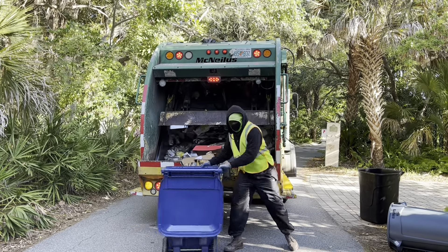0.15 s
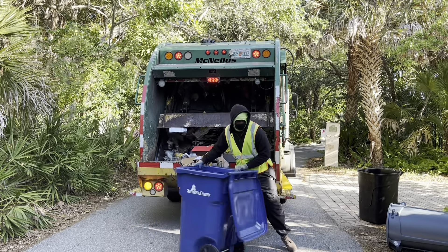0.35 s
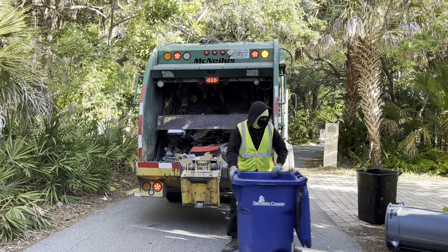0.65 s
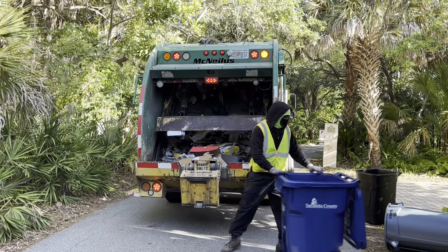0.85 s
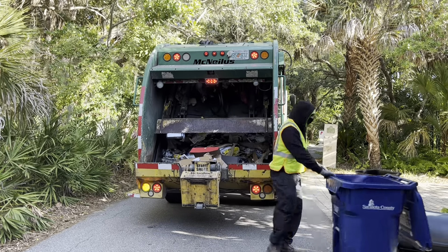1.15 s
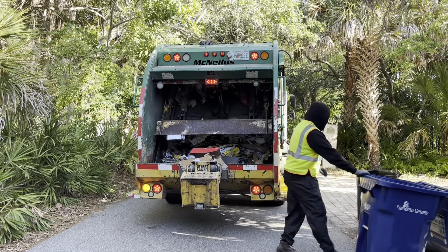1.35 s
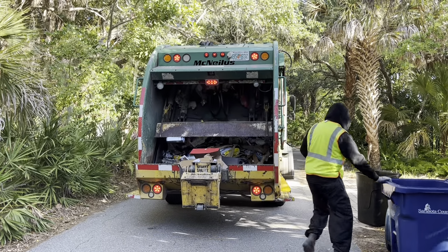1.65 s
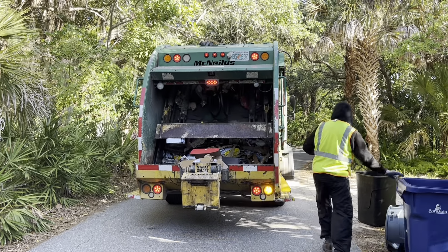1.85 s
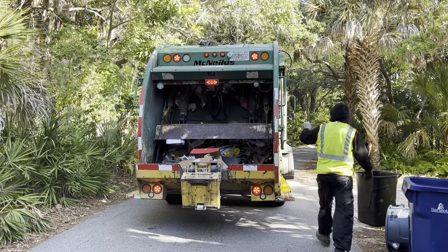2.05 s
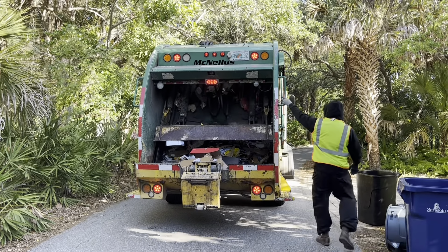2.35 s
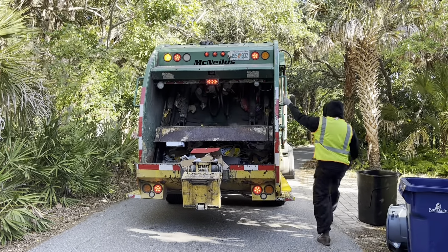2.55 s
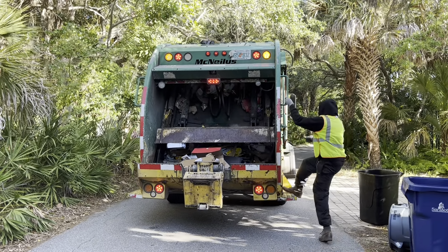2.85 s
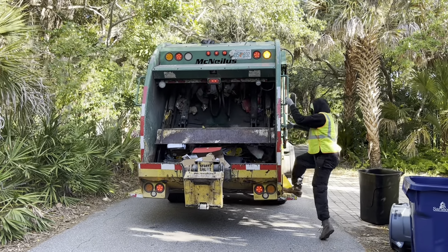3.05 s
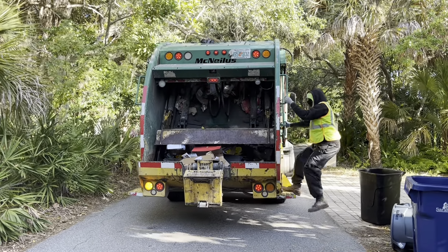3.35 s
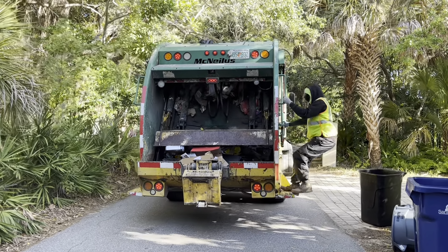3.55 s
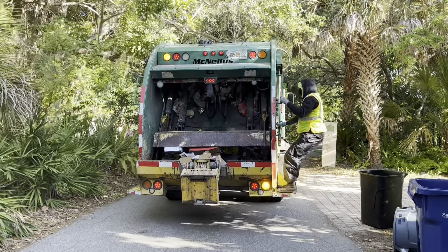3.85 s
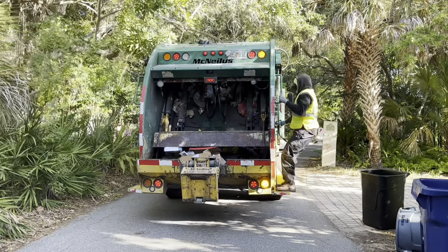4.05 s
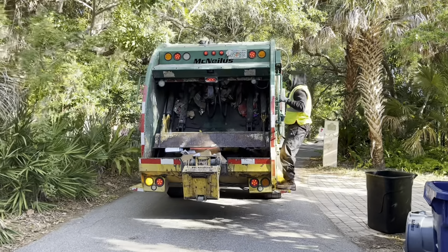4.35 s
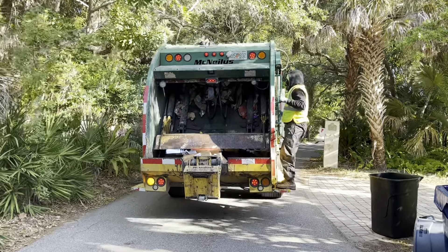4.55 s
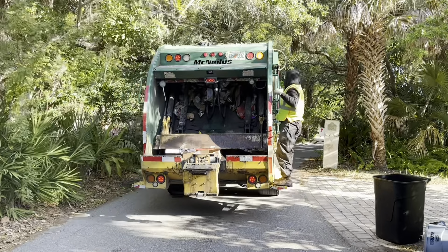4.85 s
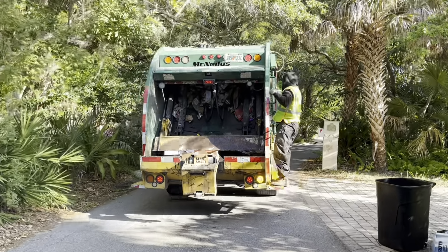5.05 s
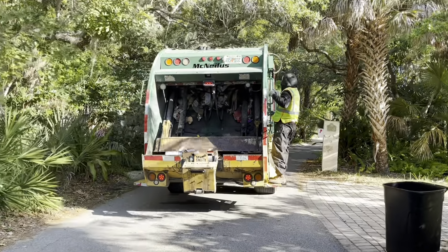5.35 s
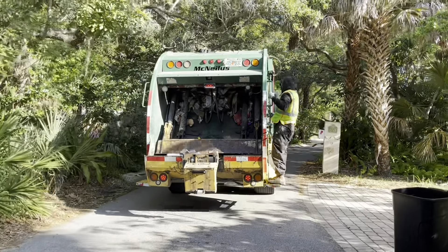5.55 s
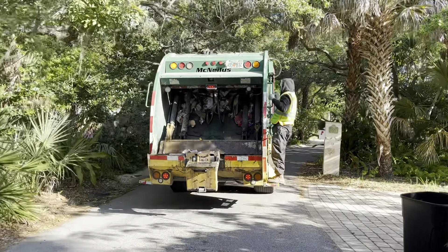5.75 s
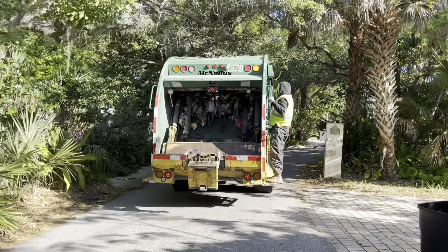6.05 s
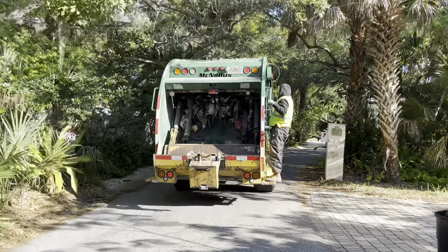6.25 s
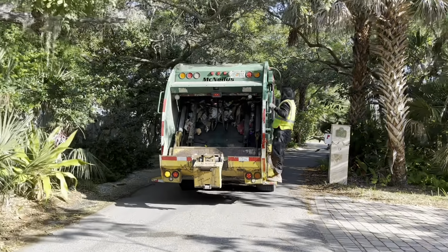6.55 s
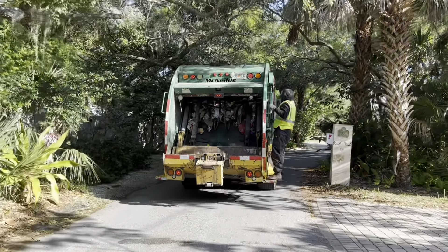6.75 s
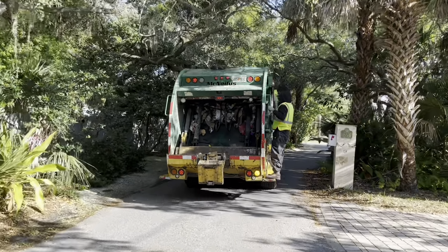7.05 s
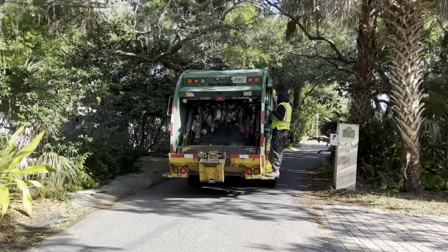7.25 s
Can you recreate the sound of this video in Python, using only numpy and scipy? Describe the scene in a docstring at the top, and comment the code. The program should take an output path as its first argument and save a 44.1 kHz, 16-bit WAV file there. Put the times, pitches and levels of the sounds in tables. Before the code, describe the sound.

Empty plastic bin clatters down and trundles aside, diesel truck idles, brake air bursts out, engine climbs, and loose steel bangs over a bump.

```python
"""Refuse truck and plastic cart

A refuse truck idles on a leafy lane while an empty plastic cart crashes down, is rolled aside and parked.
The air brake blows off, the gear engages and the truck pulls away; its steel body bangs over a bump.
Engine and squeaks are summed tones and noise; cart and truck body are resonances, struck or fed noise;
air is coloured noise. Two microphone ports hear everything with their own phase difference."""
import sys
import numpy as np
from scipy import signal
from scipy.fft import rfft, irfft, next_fast_len
from scipy.io import wavfile
from scipy.ndimage import map_coordinates

SR = 44100
rng = np.random.default_rng(int(sys.argv[2]) if len(sys.argv) > 2 else 0)


def file_out(sig):
    """Save sig as 16-bit WAV at sys.argv[1]."""
    # one column per channel
    cols = np.atleast_2d(sig).T
    # limit, then scale
    lim = np.clip(cols, -1, 1)
    pcm = np.round(lim * 32767).astype(np.int16)
    wavfile.write(sys.argv[1], SR, pcm)


N = 325899

# Engine speed. Each row: time in seconds, firing rate in Hz.
SPEED = [(0, 21.7), (1, 21.3), (1.9, 19.6), (2.15, 18.1), (2.4, 17.6), (2.7, 17.7), (2.85, 18.4),
         (3.9, 19.1), (4.15, 22.9), (4.4, 25.3), (4.65, 27.2), (4.9, 28.5), (5.4, 30.5), (5.9, 32.5),
         (6.4, 35.2), (6.85, 35.3), (7, 37), (7.15, 38), (7.39, 38.4)]
# Engine effort. Each row: time in seconds, effort in dB.
EFFORT = [(0, 10), (.5, 5), (1.9, -16.5), (2.4, -5), (3, -2), (3.85, 0), (4.15, 3.5), (4.5, 1.5), (6.85, 3),
          (7.05, 2), (7.39, -1.5)]
# Exhaust pipe. Each row: frequency in Hz, gain in dB.
PIPE = [(30, -6), (55, -16), (80, -1.5), (115, 3), (155, -10), (230, -21.5), (400, -28)]
# Strength of firing orders 2 to 10 in dB.
ORDERS_DB = [0, 2, 2.5, -5, -1.5, -9, -6.5, -13, -3]
# Pump whirr against its pitch. Each row: frequency in Hz, level in dB.
PUMP = [(117, -54.5), (127, -35), (143, -36.5), (153, -61), (170, -27), (190, -31), (203, -24.5),
        (217, -29), (235, -34), (250, -32.5)]
# Pump overtones. Each row: multiple of the pump order, dB at idle, dB per octave of speed.
OVERTONES = [(2, 0.5, -1), (12 / 5, -14, 9), (3, -2, -14), (4, -14, -6), (5, -18, 0)]
# Engine roar, also road rumble. Each row: frequency in Hz, density in dB per Hz.
ROAR = [(20, -57), (40, 0), (100, 2.5), (170, -5.5), (280, -10.5), (420, -9), (650, -15), (1100, -23),
        (1550, -20), (1800, -21.5), (2400, -26.5), (3700, -29), (5500, -38.5), (7500, -51), (10000, -120)]
# Fan, also hisses and ticks. Each row: frequency in Hz, density in dB per Hz.
FAN = [(2500, 3.5), (4000, -6.5), (7000, -0.5), (10000, -2), (12500, -9), (14200, -11.5), (15300, -14),
       (16000, -28)]
# Wandering turbo whistle. Each row: time in seconds, pitch in Hz.
TURBO = [(2, 4150), (2.5, 4400), (3.7, 4400), (4.15, 4680), (4.7, 4520), (5.4, 4580), (7.39, 4350)]
# Engine layers. Each holds: level at idle in dB, dB per octave of speed, share of the effort.
EXHAUST_LEVEL = (-31, 8.43, 0.48)
ROAR_LEVEL = (-37, 10.13, 0.19)
FAN_LEVEL = (-53.5, 8, 0.35)
TURBO_LEVEL = (-53.5, 5.2, 0.54)
IDLE_RATE_HZ, PUMP_ORDER = 18.5, 20 / 3
OVERTONE_SWING, OVERTONE_DB = 0.37, -27  # overtones follow a share of the whirr's dB
PULL_S, PULL_RISE_S, PULL_DB = 6.87, 0.062, 7.5  # the next gear deepens the exhaust note
TURBO_ON_S, TURBO_RISE_S, TURBO_DRIFT_HZ = 1.5, 0.5, 40

# Drumming of the rolling cart. Each row: time in seconds, level in dB.
ROLL = [(0, -43), (.3, -21.5), (.45, -20.5), (.62, -25), (.9, -20.5), (1.36, -24.5), (1.46, -49),
        (1.56, -44), (1.7, -29), (2, -44), (2.37, -38.5)]
# Air and floor of the cart. Each row: frequency in Hz, width in Hz, gain in dB.
DRUM = [(77, 21.8, 1), (104, 26.7, 1.5), (191.6, 51, -11)]
# Walls of the cart. Each row: frequency in Hz, width in Hz, gain in dB.
WALL = [(215, 57, -1), (553, 59, -2), (708, 150, -6), (1200, 570, -18.5)]
# Strongest wall mode before and after the cart is righted. Each holds: frequency in Hz, width in Hz, gain in dB.
TILTED = (340, 30, 2)
UPRIGHT = (440, 36, 6)
# Stiff lid that clacks. Each row: frequency in Hz, width in Hz, gain in dB.
LID = [(2000, 120, 2), (2960, 120, 0), (3400, 160, -1), (4230, 250, -2)]
# Loose grit. Each row: frequency in Hz, density in dB per Hz.
GRIT = [(600, -1.5), (1000, 3), (1500, 6), (2000, 2.5), (3000, -4), (4200, -8.5), (6500, -16.5), (9000, -9),
        (12000, -56), (15000, -55)]
# Cracks and scuffs. Each row: frequency in Hz, density in dB per Hz.
SNAP = [(900, 3.5), (2000, 3), (4000, -2), (7000, -7), (11000, -8.5), (15000, -23)]
# Cart knocks. Each row: time in seconds, ring in dB, crack in dB.
KNOCKS = [(0.099, -18, -31.5), (0.114, -9.5, -10.5), (.138, -12, -16), (.152, -18, -20),
          (.165, -10.5, -20.5), (0.176, -18, -29), (0.19, -11.5, -23), (0.202, -12, -23.5),
          (0.276, -26, -21), (0.32, -10.5, -26.5), (.334, -11.5, -27), (0.36, -16.5, -37),
          (0.487, -28, -40.5), (0.61, -17.5, -35.5), (0.619, -12, -51), (.638, -14.5, -55),
          (.688, -21, -33.5), (.706, -9, -34.5), (.752, -15, -43), (0.817, -23, -61), (.875, -18.5, -36.5),
          (.916, -14, -31.5), (1.032, -19.5, -36.5), (1.136, -30, -37.5), (1.199, -24.5, -38),
          (1.306, -25, -46), (1.345, -25, -43.5), (1.583, -20, -33), (1.659, -19, -45.5), (1.81, -26, -54),
          (1.876, -31, -56)]
# Cart scuffs the road. Each row: time in seconds, level in dB, t60 in seconds.
SCUFFS = [(0.266, -24, 0.28), (0.459, -35.5, 0.056), (.758, -23, 0.03), (1.827, -36.5, 0.13),
          (1.963, -43, 0.21), (2.225, -45, 0.25)]
# Wheels drop over joints in the paving. Each row: time in seconds, level in dB.
BUMPS = [(0.12, -7.5), (0.17, -12), (0.331, -14), (0.729, -0.5), (0.756, -18), (.797, -26), (.942, -6),
         (1.043, -15), (1.215, -5), (1.251, -27), (1.299, -10.5), (1.347, -10.5), (1.599, -8)]
RIGHTED_S = 0.5
WALLS_UNDER_DB, RUMBLE_UNDER_DB = -7, -28  # against the drumming
SHAKE_DB, SHAKE_T60_S = -8, 0.26  # walls shake on after a knock
THUD_DB, LID_DB = -2, -1.5  # drum against ring, lid against crack
CRACK_T60_S = 0.057
GRIND_DB, GRIND_T60_S = -1, 0.36  # grit clatters on after a crack
SCUFF_GRIT_LASTS = 1.03  # grit t60 over scuff t60
BUMP_RISE_S, BUMP_T60_S, BUMP_RUMBLE_DB = 0.016, 0.27, -4

# Truck body blows. Each row: time in seconds, panel in dB, boom in dB, treble in dB.
BANGS = [(3.978, -27.5, -32, -57), (3.988, -28.5, -32, -57), (4.015, -32, -34, -49), (4.035, -30, -31, -51),
         (4.061, -35, -28, -54), (5.999, -26.5, -48, -61), (6.445, -25, -32, -32), (6.479, -17, -19, -29.5),
         (6.493, -20, -15.5, -27), (6.505, -16, -16, -42), (6.548, -18.5, -19, -27), (6.575, -23, -21, -39),
         (6.717, -16.5, -28, -25.5), (6.726, -17.5, -29, -24), (6.734, -12.5, -20, -26.5),
         (6.769, -30, -23, -32)]
# Body panels. Each row: frequency in Hz, width in Hz, gain in dB.
PANEL = [(270, 42, -1.5), (368, 114, 0), (509, 70, 1.5), (787, 160, -6), (1390, 160, -9.5),
         (1660, 240, -12), (3400, 150, -23)]
# Broad boom. Each row: frequency in Hz, width in Hz, gain in dB.
BOOM = [(57.6, 50, -0.5), (105, 65, 1.5)]
# Hopper ring. Each row: frequency in Hz, width in Hz, gain in dB.
HOPPER = [(60, 11, -0.5), (107, 11.5, 2)]
# Rattle. Each row: frequency in Hz, density in dB per Hz.
RATTLE = [(900, -27), (1500, -5), (2000, -4), (3300, -1.5), (5000, -11.5), (8000, -8.5), (11000, -15),
          (15000, -50)]
# Loose steel. Each row: frequency in Hz, width in Hz, gain in dB.
STEEL = [(1710, 50, 1), (1890, 60, 4), (2050, 80, -3), (2360, 110, -10), (3380, 60, -14), (4500, 150, -16)]
# Ringing steel plate: start in seconds, frequency in Hz, level in dB, t60 in seconds.
PLATE = (6.73, 714.5, -15, 0.5)
# Loose steel ticks. Each row: time in seconds, level in dB.
TICKS = [(.035, -31.5), (4.385, -40), (5.454, -29)]
PANEL_T60_S, BOOM_T60_S, RATTLE_T60_S, STEEL_T60_S, TICK_T60_S = 0.25, 0.51, 0.21, 0.25, 0.072
SHUDDER_DB, HOPPER_DB, STEEL_DB = -1, 4.5, 2  # against panel, boom and treble

# High hiss swells. Each row: start in seconds, length in seconds, peak in dB.
HISSES = [(0.153, 0.28, -38), (0.58, 0.88, -46.5), (1.585, 0.46, -50), (2.79, 0.68, -50.5),
          (4.502, 0.5, -43), (6.39, 0.6, -39.5), (6.9, 0.12, -39)]

HUM_FULL_S, HUM_FADE_S, HUM_EDGE_S, HUM_HZ, HUM_DB = 1.81, 2.51, 0.24, 269.7, -40

# Two quick plops. Each row: time in seconds, top pitch in Hz, level in dB.
PLOPS = [(2.258, 1100, -27), (2.314, 1700, -29)]
PLOP_END_HZ, PLOP_FALL_S, PLOP_T60_S = 130, 0.0035, 0.09

# Brake air jet. Each row: frequency in Hz, density in dB per Hz.
JET = [(700, -7.5), (1500, -8.5), (1800, -5), (2600, -7.5), (3250, -9.5), (3800, -9), (5000, -9),
       (8000, -4), (11000, -4.5), (14000, -11), (16000, -29.5)]
# Throat of the valve. Each row: frequency in Hz, width in Hz, gain in dB.
VALVE = [(2500, 180, -10), (3360, 200, -3), (3940, 180, -1), (4820, 250, 0)]
AIR_S, AIR_ATTACK_S, AIR_HOLD_S, AIR_DB, AIR_T60_S = 2.66, 0.035, 0.072, -30.5, 0.67
VALVE_DB, VALVE_HOLD_S, WHISTLE_DB = -6, 0.045, -7  # dB against the jet
WHISTLE_HZ, WHISTLE_SAG_HZ = 3610, 405

# Squeaks. Each row: start in seconds, end in seconds, pitch in Hz, dB of multiples 1, 2 and 4.
SQUEAKS = [(4.032, 4.055, 2100, -41, -70, -80), (4.04, 4.097, 3220, -41, -70, -80),
           (4.063, 4.088, 1710, -41, -60, -80), (6.672, 6.703, 2980, -33, -39, -37),
           (6.685, 6.73, 5930, -35, -36, -90)]
SQUEAK_WAVER, SQUEAK_GRAIN_DB = 0.002, 1  # share of the pitch, unevenness

# Port phase. Each row: frequency in Hz, lead of the left port in radians.
TURN = [(0, .5), (130, .55), (260, .85), (600, .1), (1030, -.4), (1290, -2.1), (1550, -3), (1890, -6.4),
        (2500, -5.5), (3360, -5.2), (3960, -5.9), (4650, -5.8), (5770, -7.4), (6290, -7.3), (7320, -8.4),
        (7700, -9.35), (8870, -9.5), (9130, -10.2), (10200, -11.1), (11100, -12.5), (13000, -12.6),
        (13800, -14.1), (14500, -15.7), (16000, -15.7)]
# Port balance. Each row: frequency in Hz, left minus right in dB.
TRUCK_SIDE = [(60, 3.0), (110, 3.5), (200, 6.0), (380, 6.0), (700, 9.0), (1290, 6.5), (2380, 3.0),
              (4400, 8.0), (8120, 1.0), (15000, 0.0)]
# Diffuse share, different in each channel. Each row: frequency in Hz, level in dB.
DIFFUSE = [(60, -33), (200, -19.5), (500, -8.5), (1400, -4.5), (4000, -6), (6500, -24), (8200, -66),
           (11000, -11), (15000, -14)]
CART_SIDE_SHARE, CART_DIFFUSE_DB = 0.7, 1  # cart is nearer the middle, more diffuse
LOW_HZ, TOP_HZ = 43, 15735  # band of the microphone


def amp(db):
    """Decibels to amplitude."""
    return 10 ** (np.asarray(db) / 20)


def unit(x):
    """Scale to rms 1."""
    return x / np.sqrt(np.mean(x ** 2) + 1e-20)


def along(points, hz):
    """Read (Hz, value) points on a log axis."""
    f, v = np.transpose(points)
    return np.interp(np.log(hz + 1), np.log(f + 1), v)


def curves(rows):
    """One value per sample for each column after the time."""
    s, *cols = np.transpose(rows)
    return [np.interp(np.arange(N) / SR, s, c) for c in cols]


def ramp(start_s, length_s):
    """0 before the start, 1 after start + length."""
    return np.clip((np.arange(N) / SR - start_s) / length_s, 0, 1)


def wobble(rate_hz):
    """Smooth random curve with rate_hz knots a second."""
    knots = rng.standard_normal(int(N * rate_hz / SR) + 4)
    return map_coordinates(knots, [np.arange(N) * rate_hz / SR])


def tone(hz):
    """Sine of a moving pitch."""
    return np.sin(2 * np.pi * np.cumsum(hz) / SR)


def filtered(x, response):
    """Multiply the spectrum of x by a response of frequency."""
    m = next_fast_len(N + SR // 8)
    return irfft(rfft(x, m) * response(np.fft.rfftfreq(m, 1 / SR)), m)[..., :N]


def colour(points):
    """Gain of frequency from a table of dB points."""
    return lambda hz: amp(along(points, hz))


def modes(table):
    """Response of a body: a sum of resonances with alternating sign."""
    def response(f):
        total = 0
        for k, (hz, width, db) in enumerate(table):
            damping = 1j * f * width
            total = total + (-1) ** k * amp(db) * damping / (hz * hz - f * f + damping)
        return total
    return response


def noise(response, grain_db=0):
    """Coloured noise of rms 1, made of uneven grains."""
    return unit(filtered(rng.standard_normal(N) * amp(grain_db * wobble(150)), response))


def bursts(times, level_db, t60_s, rise_s):
    """Envelope of blows that rise fast and die away; powers add."""
    power, t = np.zeros(N + SR), np.arange(SR // 2) / SR
    for s, db, fade_s in np.broadcast(times, level_db, t60_s):
        decay = amp(2 * (db - 60 * t / max(fade_s, .005)))
        power[round(s * SR):][:len(t)] += decay * (1 - np.exp(-t / rise_s))
    return np.sqrt(power[:N])


def struck(table, times, level_db, rise_s):
    """Every blow rings the body's resonances at new strengths and slightly new pitches."""
    out, t = np.zeros(N + SR), np.arange(SR // 8) / SR
    hz, width, db = np.transpose(table)[:, :, None]
    draws = rng.standard_normal((len(times), 2, len(table), 1))
    for s, blow_db, (spread, bend) in zip(times, level_db, draws):
        decay = amp(db + 1.9 * spread) * np.exp(-np.pi * width * t)
        ring = decay * np.sin(2 * np.pi * (hz * (1 + 0.035 * bend) * t + spread))
        out[round(s * SR):][:len(t)] += amp(blow_db) * ring.sum(axis=0) * (1 - np.exp(-t / rise_s)) ** 2
    return out[:N]


def exhaust(rate_hz, turn):
    """Firing harmonics, each weighted by the pipe at its own frequency."""
    order = np.arange(2, 11)[:, None]
    levels_db = along(PIPE, order * rate_hz) + np.c_[ORDERS_DB]
    levels_db = levels_db + PULL_DB * ramp(PULL_S, PULL_RISE_S) * (order == 2)
    phase = order * turn - 0.804 * order ** 2 + 0.24 * order * wobble(4)
    return (amp(levels_db) * np.cos(phase)).sum(axis=0) * amp(0.41 * wobble(6.8))


def pump(rate_hz, turn):
    """A geared pump whirrs at a fixed multiple of the firing rate, with overtones."""
    pump_db = along(PUMP, PUMP_ORDER * rate_hz)
    whirr = amp(pump_db + 2.0 * wobble(11.0)) * np.sin(PUMP_ORDER * turn)
    over_db = OVERTONE_DB + OVERTONE_SWING * pump_db
    octaves = np.log2(rate_hz / IDLE_RATE_HZ)
    for k, db, slope_db in OVERTONES:
        level = amp(over_db + db + slope_db * octaves + 2.5 * wobble(8.5))
        whirr += level * np.sin(k * PUMP_ORDER * turn + 0.45 * wobble(30))
    return whirr


def turbo_whistle():
    """Unsteady whistle: a wandering line smeared by low-passed noise."""
    band = noise(lambda hz: 1 / (1 + (hz / 230) ** 4))
    return ramp(TURBO_ON_S, TURBO_RISE_S) * band * tone(curves(TURBO)[0] + TURBO_DRIFT_HZ * wobble(1.6))


def engine():
    """Exhaust, roar pulsing slightly with each firing, fan and turbo follow speed and effort; pump follows speed."""
    rate_hz, effort_db = curves(SPEED)[0], curves(EFFORT)[0]
    turn = 2 * np.pi * np.cumsum(rate_hz * (1 + 0.0016 * wobble(12))) / SR

    def level(idle_db, slope_db, share):
        return amp(idle_db + slope_db * np.log2(rate_hz / IDLE_RATE_HZ) + share * effort_db)

    roar = (1 + 0.022 * np.cos(turn)) * noise(colour(ROAR), grain_db=-0.5) * amp(0.9 * wobble(5))
    fan = noise(colour(FAN), grain_db=0.5) * amp(1.6 * wobble(7.2))
    out = level(*EXHAUST_LEVEL) * exhaust(rate_hz, turn) + pump(rate_hz, turn)
    out += level(*ROAR_LEVEL) * roar + level(*FAN_LEVEL) * fan
    return out + level(*TURBO_LEVEL) * turbo_whistle()


def cart():
    """Wheels drum the hollow cart and shake its walls; knocks ring drum, walls and lid, crack and stir grit."""
    s, ring_db, crack_db = np.transpose(KNOCKS)
    scuff_s, scuff_db, scuff_t60_s = np.transpose(SCUFFS)
    bump_s, bump_db = np.transpose(BUMPS)

    roll_end = (ROLL[-1][0] + 0.079, -90)
    drum = amp(curves(list(ROLL) + [roll_end])[0])
    bumps = bursts(bump_s, bump_db + BUMP_RUMBLE_DB, BUMP_T60_S, BUMP_RISE_S)
    out = np.hypot(drum, bumps) * (noise(modes(DRUM)) + amp(RUMBLE_UNDER_DB) * noise(colour(ROAR)))
    out += struck(DRUM, bump_s, bump_db, rise_s=0.0082)
    out += struck(DRUM, s, ring_db + THUD_DB, rise_s=0.0031)

    knock_shake = bursts(s, ring_db + SHAKE_DB, SHAKE_T60_S, rise_s=0.005)
    shake = np.hypot(amp(WALLS_UNDER_DB) * drum, knock_shake)
    early, righted = s < RIGHTED_S, ramp(RIGHTED_S, .05)
    for mode, rows, share in (TILTED, early, 1 - righted), (UPRIGHT, ~early, righted):
        walls = sorted([*WALL, mode], key=lambda row: row[0])
        out += share * shake * noise(modes(walls), grain_db=3.5)
        out += struck(walls, s[rows], ring_db[rows], rise_s=0.0019)

    cracks = bursts(s, crack_db, CRACK_T60_S, rise_s=0.0023)
    scuffs = bursts(scuff_s, scuff_db, scuff_t60_s, rise_s=0.00047)
    out += np.hypot(cracks, scuffs) * noise(colour(SNAP))
    out += struck(LID, s, crack_db + LID_DB, rise_s=0.00046)

    grit_db = np.r_[crack_db, scuff_db] + GRIND_DB
    grit_t60_s = np.r_[GRIND_T60_S + 0 * s, SCUFF_GRIT_LASTS * scuff_t60_s]
    grit = bursts(np.r_[s, scuff_s], grit_db, grit_t60_s, rise_s=0.0003)
    return out + grit * noise(colour(GRIT), grain_db=2.5)


def body_bangs():
    """Blows shake the panels, boom in the hopper and rattle loose steel; one plate rings on; steel ticks."""
    s, panel_db, boom_db, treble_db = np.transpose(BANGS)
    out = struck(PANEL, s, panel_db, rise_s=0.0021)
    out += bursts(s, panel_db + SHUDDER_DB, PANEL_T60_S, rise_s=0.0078) * noise(modes(PANEL))
    out += bursts(s, boom_db, BOOM_T60_S, rise_s=0.016) * noise(modes(BOOM))
    out += struck(HOPPER, s, boom_db + HOPPER_DB, rise_s=0.0025)
    out += bursts(s, treble_db, RATTLE_T60_S, rise_s=0.0045) * noise(colour(RATTLE), grain_db=2.0)
    out += bursts(s, treble_db + STEEL_DB, STEEL_T60_S, rise_s=0.017) * noise(modes(STEEL), grain_db=4.5)
    out += bursts(*np.transpose(TICKS), TICK_T60_S, rise_s=0.0015) * noise(colour(FAN))
    start_s, hz, plate_db, t60_s = PLATE
    plate = bursts([start_s], [plate_db], t60_s, rise_s=0.0057)
    return out + plate * np.sin(2 * np.pi * hz * np.arange(N) / SR)


def hisses():
    """Fan-coloured noise swells and sinks in half-sine arcs."""
    swell = sum(amp(db) * np.sin(np.pi * ramp(s, length_s)) for s, length_s, db in HISSES)
    return swell * noise(colour(FAN), grain_db=2.0)


def hum():
    """A nearly steady tone swells and fades."""
    gate = ramp(HUM_FULL_S - HUM_EDGE_S, HUM_EDGE_S) - ramp(HUM_FADE_S, HUM_EDGE_S)
    return gate * amp(HUM_DB + 1.0 * wobble(5.3)) * tone(HUM_HZ + 2.1 * wobble(2.84))


def plops():
    """A tone drops from a click to a thud within milliseconds."""
    out, t = np.zeros(N), np.arange(SR // 8) / SR
    for s, top_hz, db in PLOPS:
        fall = (top_hz - PLOP_END_HZ) * PLOP_FALL_S * (1 - np.exp(-t / PLOP_FALL_S))
        cycles = PLOP_END_HZ * t + fall
        shape = amp(db - 60 * t / PLOP_T60_S) * (1 - np.exp(-t / .001))
        out[round(s * SR):][:len(t)] += shape * np.sin(2 * np.pi * cycles)
    return out


def brake_air():
    """Compressed air escapes from a valve; at full flow the throat colours it and a sinking whistle sounds."""
    def release(hold_s):
        since_hold_s = np.maximum(np.arange(N) / SR - AIR_S - AIR_ATTACK_S - hold_s, 0)
        return amp(AIR_DB - 60 * since_hold_s / AIR_T60_S)

    attack = ramp(AIR_S, AIR_ATTACK_S)
    jet = release(AIR_HOLD_S) * noise(colour(JET), grain_db=0.5)
    whistle_hz = WHISTLE_HZ - WHISTLE_SAG_HZ * np.sqrt(ramp(AIR_S + AIR_ATTACK_S, VALVE_HOLD_S))
    whistle = noise(lambda f: 1 / (1 + (f / 110) ** 4)) * tone(whistle_hz)
    throat = amp(VALVE_DB) * noise(modes(VALVE), grain_db=-3.0) + amp(WHISTLE_DB) * whistle
    full_flow = attack * release(VALVE_HOLD_S) ** 2 / amp(AIR_DB)  # fades twice as fast in dB
    return attack * (jet + full_flow * throat)


def squeaks():
    """Steel joints stick and slip for a moment: short wavering tones of rising pitch."""
    out = np.zeros(N)
    for start_s, end_s, hz, *levels_db in SQUEAKS:
        n = round((end_s - start_s) * SR)
        bend = SQUEAK_WAVER * wobble(300)[:n] + np.linspace(-.008, .008, n)
        turn = 2 * np.pi * np.cumsum(hz * (1 + bend)) / SR
        shape = signal.windows.tukey(n, .5) * amp(SQUEAK_GRAIN_DB * wobble(220)[:n])
        partials = sum(amp(db) * np.sin(2 ** k * turn) for k, db in enumerate(levels_db))
        out[round(start_s * SR):][:n] += shape * partials
    return out


def ports(x, balance_db, diffuse_db=0):
    """Both ports get the direct sound, turned in phase, and each its own diffuse tail."""
    f, turn = np.transpose(TURN)
    half = np.array([[.5], [-.5]])

    def port_response(hz):
        return amp(half * balance_db(hz)) * np.exp(1j * half * np.interp(hz, f, turn))

    t = np.arange(SR // 4) / SR
    tails = rng.standard_normal((2, len(t))) * amp(-60 * t / 0.075)
    diffuse = signal.fftconvolve(x[None], tails / np.linalg.norm(tails[0]), axes=1)[:, :N]
    return filtered(x, port_response) + amp(diffuse_db) * filtered(diffuse, colour(DIFFUSE))


def scene():
    """Truck to the left, cart nearer the middle, hum, plops and brake air almost central."""
    truck = engine() + body_bangs() + hisses() + squeaks()
    out = ports(truck, lambda hz: along(TRUCK_SIDE, hz))
    out += ports(cart(), lambda hz: CART_SIDE_SHARE * along(TRUCK_SIDE, hz), CART_DIFFUSE_DB)
    return out + ports(hum() + plops() + brake_air(), lambda hz: 0.42 + 0 * hz)


def record(dry):
    """The deepest bass is lost, the loudest peaks are rounded off, nothing is kept above the band limit."""
    heard = filtered(dry, lambda hz: (1j * hz / (LOW_HZ + 1j * hz)) ** 2)
    rounded = heard / (1 + np.abs(heard / 1.1) ** 4) ** (1 / 4)
    return filtered(rounded, lambda hz: hz < TOP_HZ)


dry = scene()
out = record(dry)
file_out(out)
```